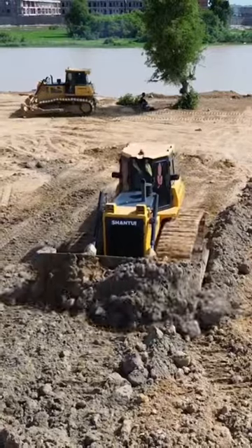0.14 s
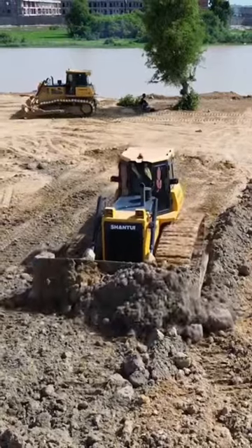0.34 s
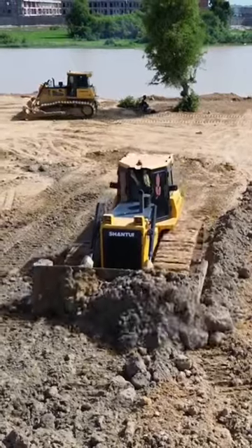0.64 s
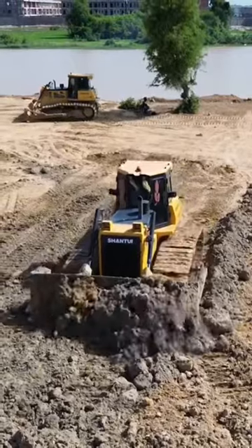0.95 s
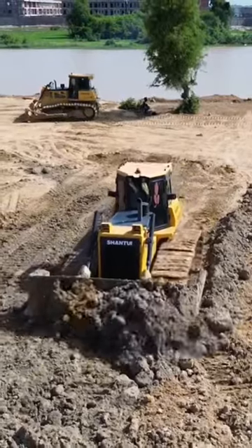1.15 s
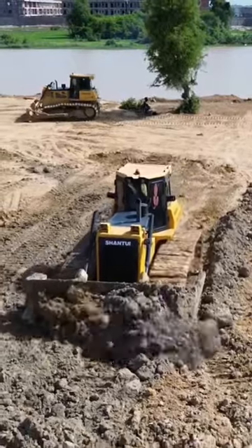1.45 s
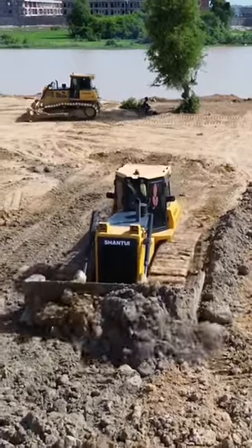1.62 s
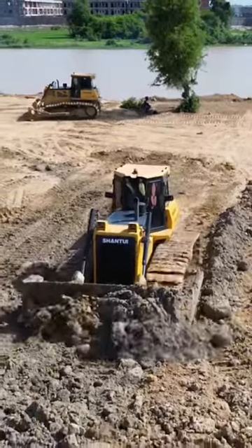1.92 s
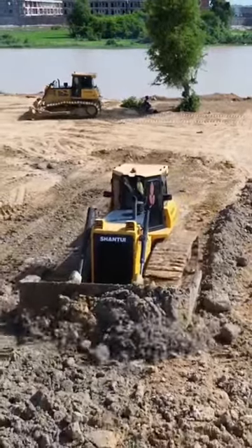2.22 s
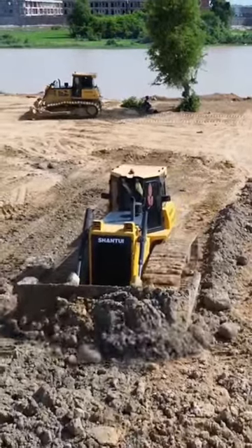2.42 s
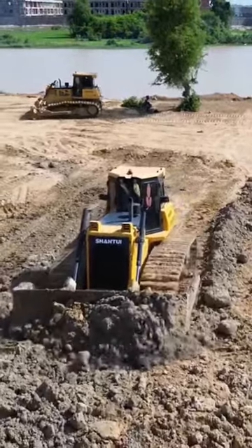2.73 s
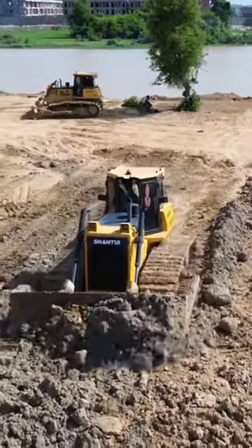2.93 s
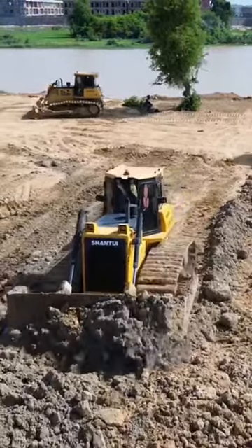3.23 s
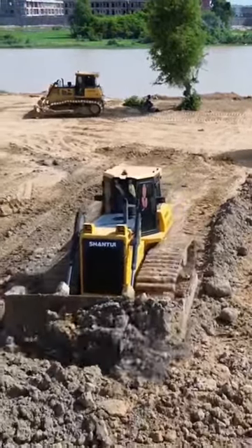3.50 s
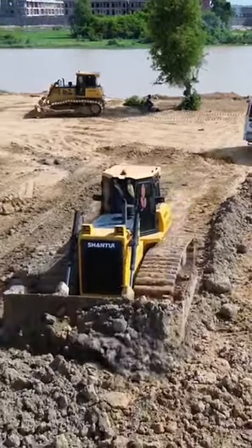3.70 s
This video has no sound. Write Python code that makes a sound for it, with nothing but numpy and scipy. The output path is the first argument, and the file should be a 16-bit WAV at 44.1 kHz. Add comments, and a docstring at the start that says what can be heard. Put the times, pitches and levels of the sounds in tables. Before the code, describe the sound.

A heavy diesel bulldozer rumbles and roars, its track shoes clanking regularly over rough earth

```python
"""Open work site: a bulldozer pushes soil, its six-cylinder diesel droning at a nearly steady speed.
Sines locked to the firing make the drone and gear whine; shaped noise makes the roar, clatter and soil hiss.
A thin turbocharger whistle flutters on top, and uneven exhaust puffs ring resonators.
Track shoes clack down about five times a second: bursts of contacts and sharp blows ring damped steel.
Grit keeps the steel singing, dry pins squeal faintly, and clods thud as earth spills off the blade."""
import sys
import numpy as np
from scipy import signal
from scipy.fft import rfft, irfft
from scipy.io import wavfile
from scipy.ndimage import uniform_filter1d

SR = 44100
rng = np.random.default_rng(int(sys.argv[2]) if len(sys.argv) > 2 else 0)


def digitize_waveform(pressure):
    """Quantize a signal to 16-bit integers and store it at the path in sys.argv[1].

    Rows of a 2-D input are taken as channels; values are limited to [-1, 1].
    """
    field = np.atleast_2d(pressure).T
    bounded = np.clip(field, -1, 1)
    quanta = np.round(bounded * 32767).astype(np.int16)
    wavfile.write(sys.argv[1], SR, quanta)


N = 170226  # length in samples

# Stereo image of the noises: [f/Hz, likeness of left and right from 0 to 1]
STEREO_LIKENESS = [(60, 0.52), (150, 0.78), (450, 0.96), (800, 0.86), (2300, 0.95), (3200, 0.82),
                   (5500, 0.28), (6900, 0.5)]
# Stereo lean: [f/Hz, left minus right level/dB]
STEREO_LEAN = [(30, 4), (60, -1), (80, 2), (100, 13), (130, 1.5), (330, -0.5), (700, 1.6), (1150, 0.2),
               (1400, -4), (1750, 1.5), (2050, 0), (2400, 1.5), (3600, 1.5), (5700, 0), (8000, 0.5)]
# Stereo phase: [f/Hz, lead of left over right/rad]
STEREO_LEAD = [(100, 0.25), (750, -0.42), (1250, 0.65), (1600, 1.56), (2900, 2), (4000, 0.88), (4900, 0.5),
               (5300, 0.7), (6500, 1), (7500, 1.5), (9000, 5)]
CEILING, CUTOFF_HZ = 1.6, 15200  # soft amplitude limit; treble is 70 dB down from the cutoff up

# Colour of the spilling earth: [f/Hz, relative level per Hz/dB]
SOIL_COLOUR = [(2500, -15), (4000, -9.5), (5000, 0), (5600, 2.5), (6200, -2.5), (7200, -5), (8100, 0),
               (8900, -20), (10300, -7), (12000, -12.5), (15000, -23)]
# Surges of the spilling earth, before the trim: [t/s, level/dB]
SOIL_SURGES = [(0, -50), (.3, -51), (.7, -51), (1.07, -52.5), (1.43, -49), (1.7, -46.5), (2.15, -52),
               (2.6, -48.5), (3.25, -50.5), (3.86, -47.5)]
SOIL_TRIM_DB, SOIL_FLUTTER_DB, SOIL_FLUTTER_HZ, SOIL_PATCHY_DB = 4.5, 1.8, 170, 2.2

# Heavy clods hitting the ground, before the trim: [t/s, peak level/dB, f/Hz]
CLOD_THUDS = [(.103, -9, 243), (.177, -3, 174), (.553, -11, 210), (.915, -13, 173), (1.305, -11, 136),
              (3.508, -8, 168.4)]
THUD_T60_S, THUD_TRIM_DB, THUD_SPREAD = 0.063, 2, 0.26  # spread: rough offset of side modes, share of pitch

# Faint squeals of dry track pins: [start t/s, end t/s, f/Hz, mean level/dB rms]
PIN_SQUEALS = [(.6, 2.5, 5520, -50.5), (1.41, 1.8, 5470, -49.5), (2.18, 2.67, 5700, -50)]
SQUEAL_WIDTH_HZ, SQUEAL_FADE_S, SQUEAL_FLUTTER_DB = 240, 0.02, 2.5

# Running-gear steel rubbed by grit: [f/Hz, relative drive level/dB]
STEEL_MODES = [(3333, 0), (3950, -4.5), (4690, 0.5), (5480, -1.5), (6100, 2), (6614, 0.5), (7130, -1)]
# Grinding of the running gear, before the trim: [t/s, level/dB]
GRINDING_LEVEL = [(0, -43.5), (1.3, -44), (3.25, -51.5)]
STEEL_TRIM_DB, STEEL_T60_S = -3, 0.025

# Track links knocking the idler as a shoe comes down, before trim and dulling: [t/s, peak level/dB, f/Hz]
LINK_KNOCKS = [(.104, -19.5, 796), (.111, -14, 1190), (.298, -17, 1300), (.487, -16, 1200),
               (.674, -15, 983), (1.049, -12, 1190), (1.257, -19, 1166), (1.447, -15.5, 1040),
               (1.822, -13, 1040), (2.003, -17, 1080), (2.195, -10, 1090), (2.378, -16, 1140),
               (2.769, -20, 1160), (3.148, -15, 1180), (3.347, -19.5, 1140), (3.503, -15, 1110),
               (3.731, -16, 1130)]
KNOCK_T60_S, KNOCK_TRIM_DB, KNOCK_SPREAD = 0.064, 1, 0.13

# Track shoes landing, before trim and low cut: [t/s, level/dB, tilt about 800 Hz/dB per octave]
SHOE_CLACKS = [(.11, -15.5, -14), (.297, -13.5, -13), (.488, -14, -21), (.675, -17, -14), (.691, -20, -6),
               (.861, -19, -14), (1.058, -16.5, -8), (1.267, -19.5, -17), (1.448, -24.5, -2),
               (1.626, -23, 7), (1.823, -18.5, 0), (2.011, -21, 0), (2.195, -19, -5), (2.383, -21, -12),
               (2.59, -24, 5), (2.764, -16, -6), (2.958, -16.5, -8), (3.151, -17, -12), (3.326, -14, -17),
               (3.349, -16.5, -2)]
# Modes of an earth-damped shoe: [f/Hz, relative level/dB, t60/s]
SHOE_MODES = [(355, -7, 0.011), (483, -6, 0.072), (568, -1, 0.054), (696, -2.5, 0.023), (747, 5, 0.079),
              (840, 7.5, 0.023), (923, 0, 0.045), (1105, -13, 0.26), (1250, -7.5, 0.15),
              (1370, -10.5, 0.064), (1850, -21, 0.026)]
TRACK_TRIM_DB, TRACK_PAN_DB = 0.5, 3
CRUNCH_S, CONTACTS_PER_S = 0.0095, 2700  # time to the strongest contacts; average contacts per second throughout

# Turbocharger whistle: [t/s, f/Hz, mean level/dB rms]
TURBO_WHISTLE = [(0, 9970, -60), (.3, 9960, -51.5), (.55, 10080, -60), (2.7, 10190, -57),
                 (3.45, 10130, -59), (3.86, 10320, -55)]

# Gear whines, in the order of their multiples: [level/dB rms, pitch waver/Hz, level waver/dB]
GEAR_WHINES = [(-29, 0.57, 0), (-29.5, 2.21, 0.5), (-36, 4.6, 5)]
# Pitch of each gear whine: [multiple of the firing rate]
GEAR_MULTIPLES = [1.715, 6.006, 6.99]
# Swell added to the middle gear whine: [t/s, level/dB]
MIDDLE_WHINE_SWELL = [(0, -1), (1.15, 7), (1.35, 1), (2.1, 3)]

# Colour of engine and fan roar: [f/Hz, relative level per Hz/dB]
ROAR_COLOUR = [(22, -26), (35, -24), (50, -6), (65, -0.5), (90, 1.5), (130, -2.5), (200, 0), (310, -8),
               (420, -5.5), (478, -4), (520, -12), (640, -11.5), (760, -11), (900, -17), (1300, -16.5),
               (1600, -24.5), (1950, -21), (2200, -34.5), (4000, -65.5)]
ROAR_DB, ROAR_SWELL_DB, ROAR_PATCHY_DB = -16.5, 0.27, 1.0

# Colour of combustion clatter: [f/Hz, relative level per Hz/dB]
CLATTER_COLOUR = [(1000, -1.5), (1700, -3), (2250, 1), (2650, 1), (3000, -6), (3800, -9), (4600, -9),
                  (7000, -38), (12000, -47), (15000, -46)]
# Loudness of combustion clatter: [t/s, level/dB]
CLATTER_LOUDNESS = [(0, -33.5), (1.0, -36), (1.7, -36.5), (2.6, -37.5), (3.3, -40), (3.86, -36.5)]
FIRING_PULSE, CRANK_PULSE, CLATTER_PATCHY_DB = 0.062, 0.023, 2.5  # pulses are modulation depths

# Resonances of the exhaust stack: [f/Hz, relative level/dB, t60/s]
STACK_MODES = [(128, -3, 0.047), (193.6, 1.5, .04), (235.7, -2.5, 0.048), (289.6, -3, 0.032),
               (383, -5, 0.029)]
# Strength of each cylinder's puff: [level/dB]
CYLINDER_STRENGTHS = [4, -8, 6.5, -3, 4, -1]
# Loudness of the puffs: [t/s, level/dB]
PUFF_LOUDNESS = [(.5, -21), (.8, -25), (2.9, -28.5), (3.86, -22.5)]
PUFF_SCATTER_DB = 2.2  # random strength; scatter stops at twice this

# Engine speed: [t/s, firing rate f/Hz]
ENGINE_SPEED = [(0, 77.9), (.6, 77.9), (1.3, 77.9), (1.7, 77.4), (2.4, 77.9), (3.0, 77.6), (3.5, 77.6),
                (3.68, 76.5), (3.86, 77.3)]
# Exhaust tones, before load and pan: [cycles per six firings, mean level/dB rms]
EXHAUST_ORDERS = [(6, -18.5), (18, -40.5), (20, -36), (26, -36.5), (28, -34)]
# Engine load, as a level change of the drone: [t/s, level/dB]
ENGINE_LOAD = [(0, -1.5), (1, -3.5), (3.86, 1)]
EXHAUST_WOBBLE_DB, EXHAUST_PAN_DB = 0.54, 2.5


def from_db(db):
    """Turn decibels into gain."""
    return 10 ** (np.asarray(db) / 20)


def rms_one(x):
    """Scale to unit rms."""
    return x / np.sqrt(np.mean(x ** 2) + 1e-20)


def in_time(rows):
    """Draw straight automation lines through the rows, one array per value column."""
    times, *columns = np.transpose(rows)
    return [np.interp(np.arange(N) / SR, times, column) for column in columns]


def per_bin(points):
    """Read a frequency curve at every spectral bin, on a log-frequency axis."""
    hz, value = np.transpose(points)
    bin_hz = np.arange(N // 2 + 1) * SR / N
    return np.interp(np.log(bin_hz + 1), np.log(hz), value)


def drift(rate):
    """Smooth random wander of unit rms: noise through two equal poles at the rate in Hz."""
    step = 40  # samples between wander points
    pole = np.exp(-2 * np.pi * rate * step / SR)
    noise = rng.standard_normal(N // step + 2002)
    wander = signal.lfilter([1], [1, -2 * pole, pole ** 2], noise)[2000:]  # drop the filter's start
    return np.interp(np.arange(N) / step, np.arange(len(wander)), rms_one(wander))


def phase_of(hz):
    """Add up a changing frequency into running phase."""
    return 2 * np.pi * np.cumsum(hz) / SR


def tone(phase, db):
    """A sine of the given rms level."""
    return np.sqrt(2) * from_db(db) * np.sin(phase)


def pan(x, db):
    """Set the left-right level difference; positive leans left."""
    return x * from_db([[db / 2], [-db / 2]])


def ring(drive, hz, t60):
    """A struck or rubbed mode: a two-pole resonator that falls 60 dB in t60 seconds."""
    decay, turn = from_db(-60 / (t60 * SR)), 2 * np.pi * hz / SR
    feedback = [1, -2 * decay * np.cos(turn), decay ** 2]
    return signal.lfilter([0, np.sin(turn)], feedback, drive + 1e-18)  # the offset avoids denormals


def stereo_noise(colour):
    """Coloured noise of unit rms, with likeness, level and phase set between left and right."""
    mid, side = rfft(rng.standard_normal((2, N)))
    alike = np.clip(per_bin(STEREO_LIKENESS), 0, 1)
    sign = np.array([[1], [-1]])  # left, right
    pair = np.sqrt(1 + alike) * mid + sign * np.sqrt(1 - alike) * side
    gain = from_db(per_bin(colour) + sign * per_bin(STEREO_LEAN) / 2)
    turn = np.exp(1j * sign * per_bin(STEREO_LEAD) / 2)
    return rms_one(irfft(pair * gain * turn, N))


def flicker(x, low_hz, high_hz, patchy_db, rate):
    """Let each of 16 overlapping bands swell and sink on its own; unit rms."""
    bin_hz = np.arange(N // 2 + 1) * SR / N
    spectrum = rfft(x)
    centres = np.geomspace(low_hz, high_hz, 16)
    out = 0
    for share in np.eye(len(centres)):
        band = irfft(spectrum * np.interp(bin_hz, centres, share), N)
        out = out + band * from_db(patchy_db * drift(rate))
    return rms_one(out)


def blows(rows, t60, spread):
    """Sharp blows, each an impulse ringing a main mode and two half-strength side modes."""
    out = np.zeros(N + SR)
    click = signal.unit_impulse(SR // 5)
    for onset, db, hz in rows:
        hit = ring(click, hz, t60)
        for side in (-1, 1):
            side_hz = hz * (1 + side * spread * rng.uniform(0.58, 1.28))
            hit = hit + ring(click, side_hz, t60) / 2
        start = int(max(onset, 0) * SR)
        out[start:start + len(hit)] += from_db(db) * hit / np.abs(hit).max()
    return out[:N]


def soil():
    """Crumbs slide off the blade in surges: fluttering, patchy hiss."""
    surge_db, = in_time(SOIL_SURGES)
    level_db = SOIL_TRIM_DB + surge_db + SOIL_FLUTTER_DB * drift(SOIL_FLUTTER_HZ)
    hiss = flicker(stereo_noise(SOIL_COLOUR), 3700, 10450, SOIL_PATCHY_DB, rate=6.7)
    return from_db(level_db) * hiss


def thuds():
    """Big clods tumble off the heap, each a low, quickly damped blow."""
    return pan(from_db(THUD_TRIM_DB) * blows(CLOD_THUDS, THUD_T60_S, THUD_SPREAD), db=3.0)


def squeals():
    """Rubbing steel sings in a narrow, rough band: a carrier modulated by random wander."""
    t, out = np.arange(N) / SR, 0
    for start, end, hz, db in PIN_SQUEALS:
        gate = np.clip(np.minimum(t - start, end - t) / SQUEAL_FADE_S, 0, 1)
        rough = drift(SQUEAL_WIDTH_HZ / 2) + 1j * drift(SQUEAL_WIDTH_HZ / 2)
        voice = rough * np.exp(2j * np.pi * hz * t)
        out = out + from_db(db + SQUEAL_FLUTTER_DB * drift(5.2)) * gate * voice
    return np.real([out * np.exp(0.9j), out])  # left leads by 0.9 rad


def steel():
    """Grit in the tracks keeps their high resonances ringing: noise drives wavering modes."""
    level_db, = in_time(GRINDING_LEVEL)
    grit = stereo_noise([(2000, 0), (9000, 0)])  # flat colour
    sung = 0
    for hz, db in STEEL_MODES:
        sung = sung + from_db(db + 2 * drift(7.3)) * ring(grit, hz, STEEL_T60_S)
    return from_db(STEEL_TRIM_DB + level_db) * rms_one(sung)


def knocks():
    """Steel on steel gives the track clacks a hard edge; packed earth dulls the top."""
    struck = from_db(KNOCK_TRIM_DB) * blows(LINK_KNOCKS, KNOCK_T60_S, KNOCK_SPREAD)
    dulling = signal.butter(2, 1900, fs=SR, output="sos")
    return pan(signal.sosfilt(dulling, struck), db=3.0)


def tracks():
    """Each shoe lands in a short crunch of random contacts that rings its earth-damped steel."""
    out, t = np.zeros(N + SR), np.arange(SR // 5) / SR
    for landing, db, tilt_db in SHOE_CLACKS:
        strength = np.exp(-((t - CRUNCH_S) / CRUNCH_S * 2) ** 2 / 2)
        strength += 0.06 * np.exp(-t / 0.026)  # weak trailing contacts
        contacts = (rng.random(len(t)) < CONTACTS_PER_S / SR) * strength
        hit = 0
        for hz, mode_db, t60 in SHOE_MODES:
            gain = from_db(mode_db + tilt_db * np.log2(hz / 800))
            hit = hit + gain * ring(contacts * rng.standard_normal(len(t)), hz, t60)
        loudest = np.sqrt(uniform_filter1d(hit ** 2, size=400).max())  # highest 9 ms rms
        start = int(max(landing - CRUNCH_S, 0) * SR)
        out[start:start + len(t)] += from_db(db + TRACK_TRIM_DB) * hit / loudest
    low_cut = signal.butter(2, 280, "high", fs=SR, output="sos")
    return pan(signal.sosfilt(low_cut, out[:N]), TRACK_PAN_DB)


def turbo():
    """A thin, fluttering whistle: one sine with wandering pitch and level."""
    hz, db = in_time(TURBO_WHISTLE)
    phase = phase_of(hz + 9 * drift(60))
    level_db = db + 2.5 * drift(16)
    return np.array([tone(phase + lead, level_db) for lead in (0, np.pi / 2)])  # right leads


def whines(firing):
    """Parts geared to the crank sing with a wavering pitch; the middle one swells and fades."""
    out = 0
    swells_db = (0, in_time(MIDDLE_WHINE_SWELL)[0], 0)
    for multiple, (db, waver_hz, waver_db), swell_db in zip(GEAR_MULTIPLES, GEAR_WHINES, swells_db):
        phase = firing * multiple + phase_of(waver_hz * drift(16.0))
        out = out + tone(phase, db + swell_db + waver_db * drift(32.0))
    return pan(out, db=3.0)


def roar(firing):
    """Turbulent exhaust and fan air: patchy noise throbbing once per turn of the crank."""
    throb = 1 + CRANK_PULSE * np.cos(firing / 3)  # three firings a turn
    level = from_db(ROAR_DB + ROAR_SWELL_DB * drift(30))
    return level * throb * flicker(stereo_noise(ROAR_COLOUR), 117.0, 2120, ROAR_PATCHY_DB, rate=4.1)


def clatter(firing):
    """Combustion noise from the block: a short burst per firing, a swell per turn of the crank."""
    level_db, = in_time(CLATTER_LOUDNESS)
    burst = np.exp(3 * (np.cos(firing) - 1))
    pulse = rms_one(1 + FIRING_PULSE * burst + CRANK_PULSE * np.cos(firing / 3))
    noise = flicker(stereo_noise(CLATTER_COLOUR), 1460, 4700, CLATTER_PATCHY_DB, rate=16)
    return from_db(level_db) * pulse * noise


def puffs(firing):
    """Every firing sends a puff of uneven strength through the resonant exhaust stack."""
    at = np.flatnonzero(np.diff(firing // (2 * np.pi)))  # samples where a firing falls
    scatter = np.clip(rng.standard_normal(len(at)), -2, 2)
    clicks = np.zeros(N)
    clicks[at] = from_db(np.resize(CYLINDER_STRENGTHS, len(at)) + PUFF_SCATTER_DB * scatter)
    beat = 0
    for k, (hz, db, t60) in enumerate(STACK_MODES):
        beat = beat + (-1) ** k * from_db(db) * ring(clicks, hz, t60)  # alternate polarity
    low_cut = signal.butter(2, 130, "high", fs=SR, output="sos")
    beat = rms_one(signal.sosfilt(low_cut, beat))
    return pan(from_db(in_time(PUFF_LOUDNESS)[0]) * beat, db=-0.2)


def exhaust(firing):
    """The drone: a firing tone and weaker lines from six unequal cylinders, scaled by load."""
    out = 0
    for order, db in EXHAUST_ORDERS:
        phase = firing * order / 6 + rng.uniform(0, 2 * np.pi)
        out = out + tone(phase, db + EXHAUST_WOBBLE_DB * drift(3.5))
    return pan(out * from_db(in_time(ENGINE_LOAD)[0]), EXHAUST_PAN_DB)


def scene():
    """Layer earth, running gear and engine, with the engine pulses on one firing phase."""
    firing = phase_of(in_time(ENGINE_SPEED)[0])
    earth = soil() + thuds()
    running_gear = squeals() + steel() + knocks() + tracks()
    engine = turbo() + whines(firing) + roar(firing) + clatter(firing) + puffs(firing) + exhaust(firing)
    return earth + running_gear + engine


def record(dry):
    """Round the peaks gently, then cut the top."""
    rounded = CEILING * np.tanh(dry / CEILING)
    top_cut = signal.cheby2(12, 70, CUTOFF_HZ, fs=SR, output="sos")
    return signal.sosfilt(top_cut, rounded)


dry = scene()
out = record(dry)
digitize_waveform(out)
```